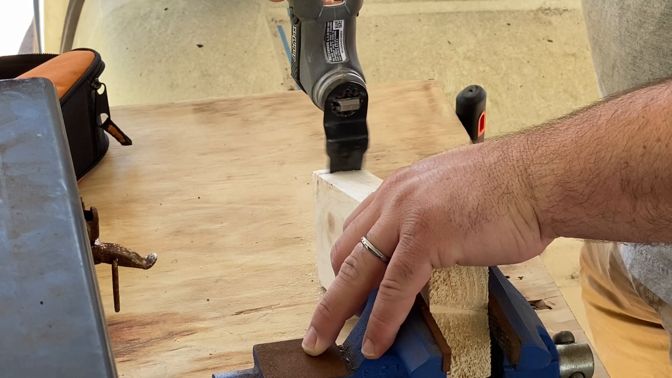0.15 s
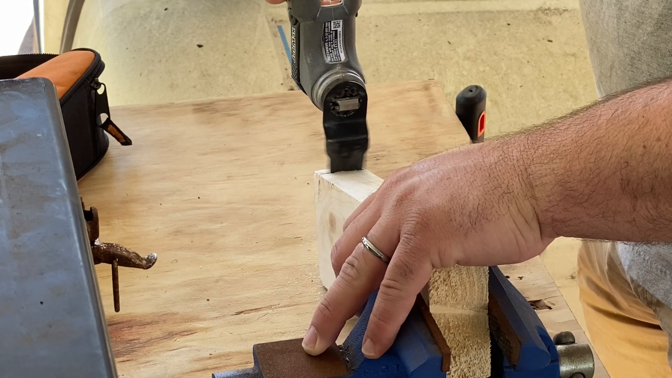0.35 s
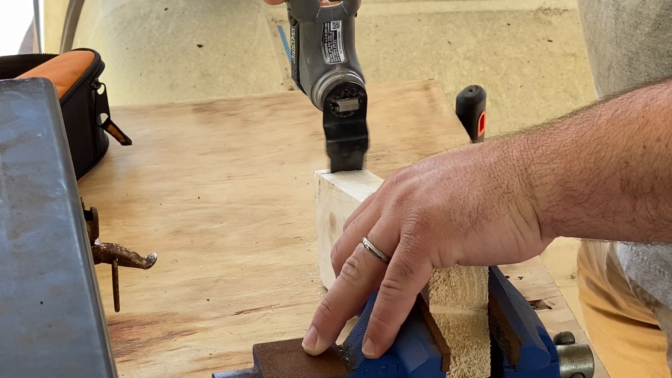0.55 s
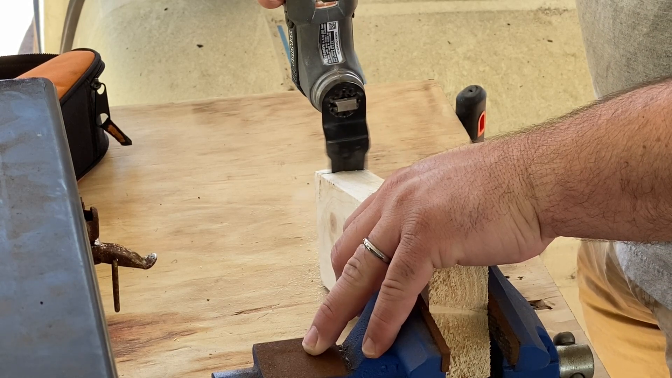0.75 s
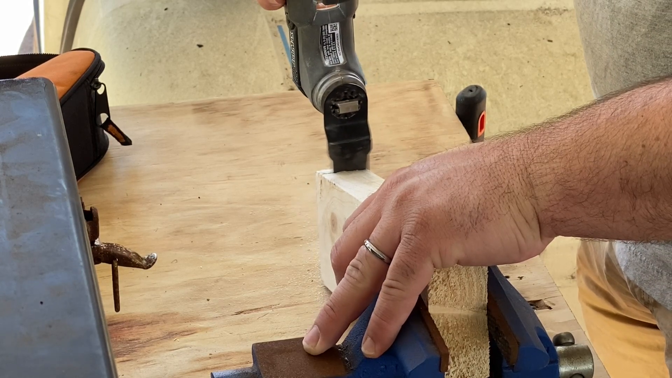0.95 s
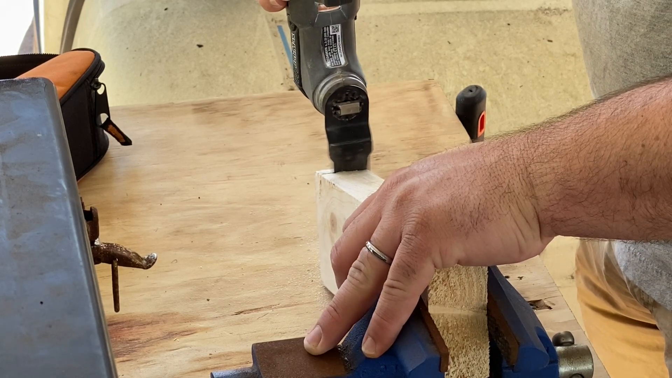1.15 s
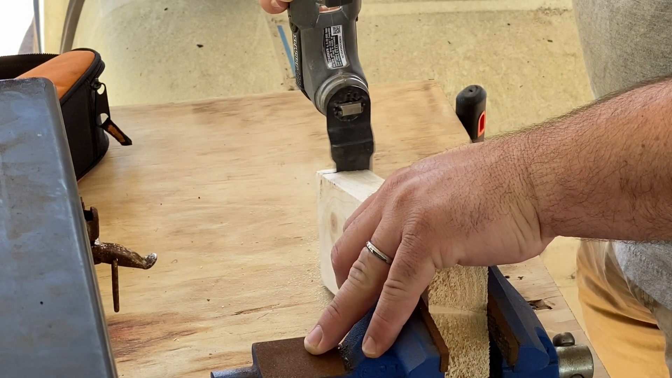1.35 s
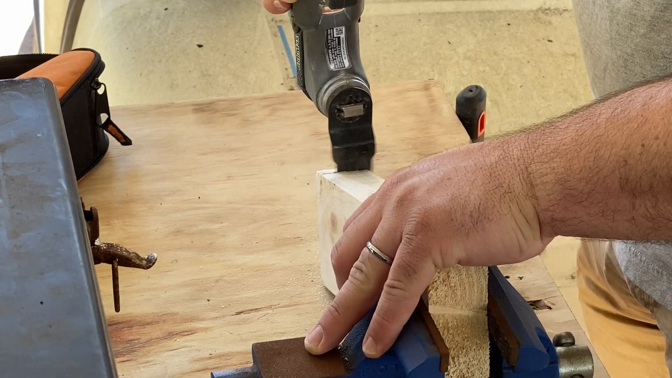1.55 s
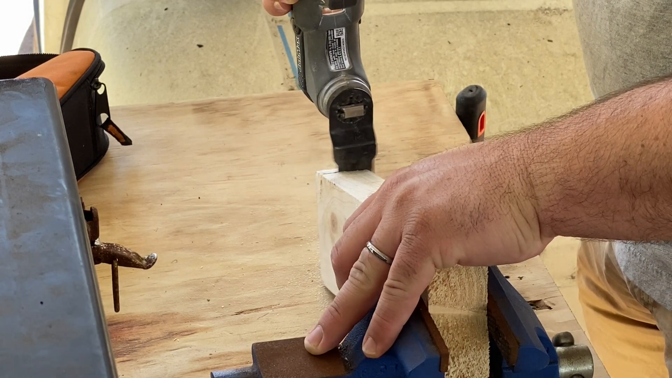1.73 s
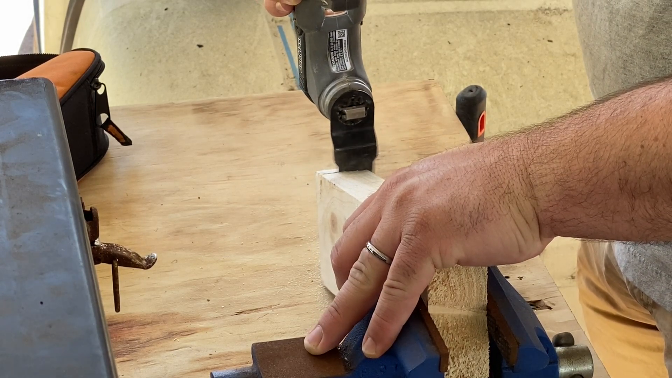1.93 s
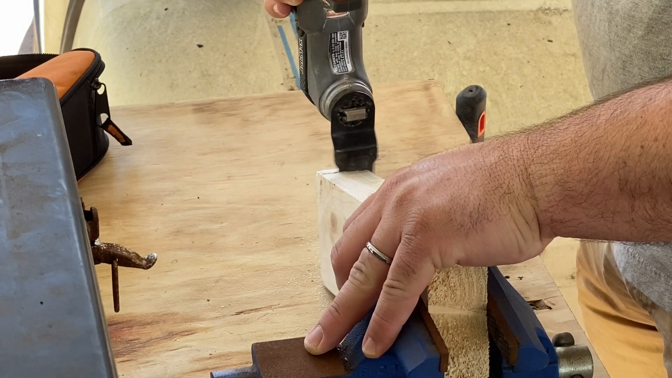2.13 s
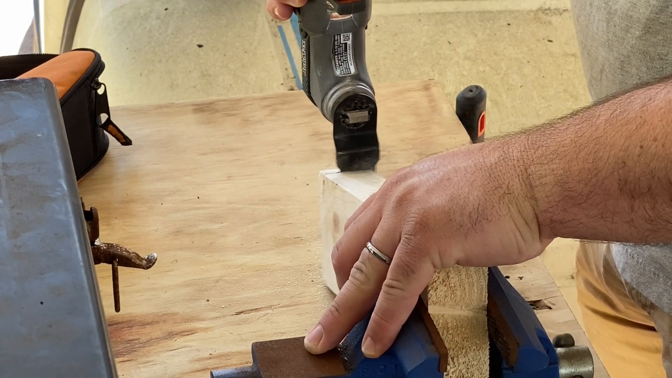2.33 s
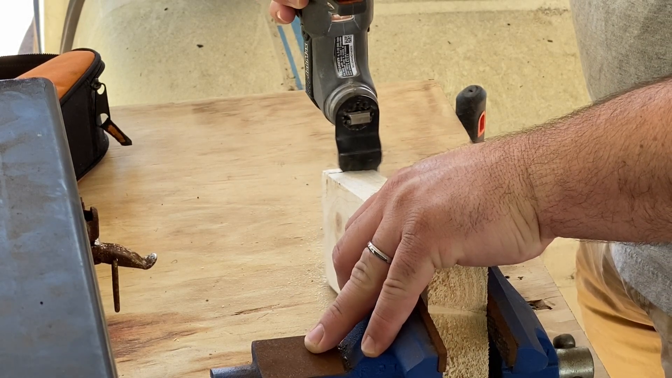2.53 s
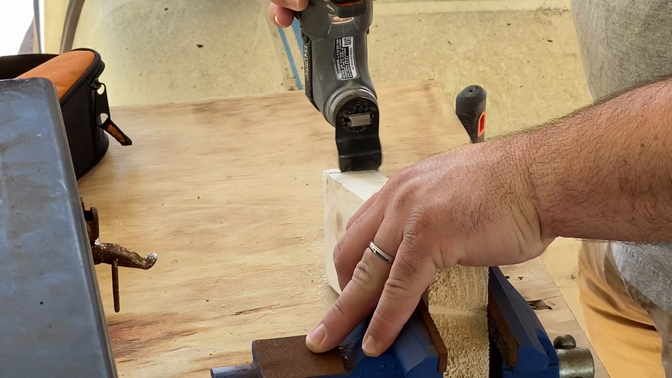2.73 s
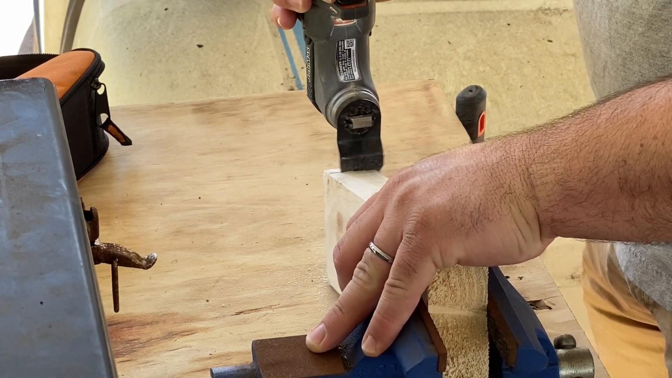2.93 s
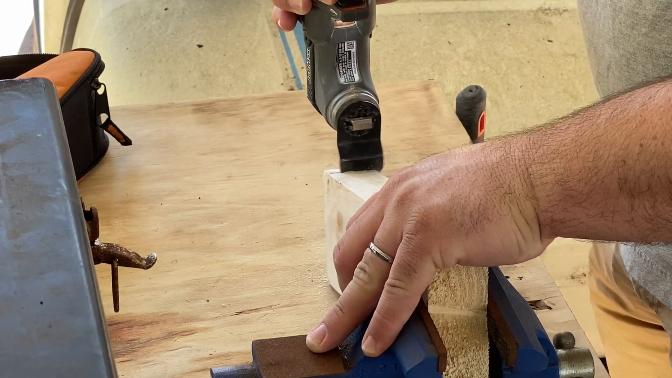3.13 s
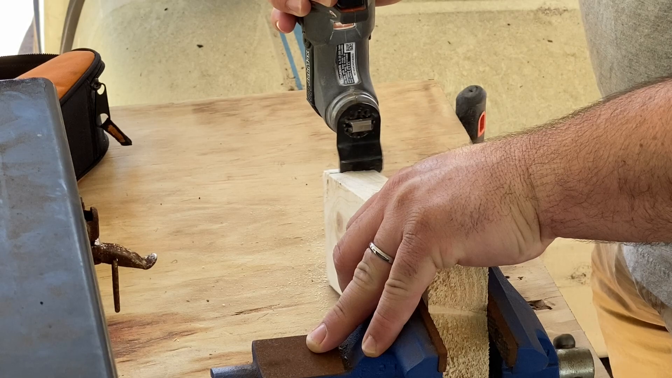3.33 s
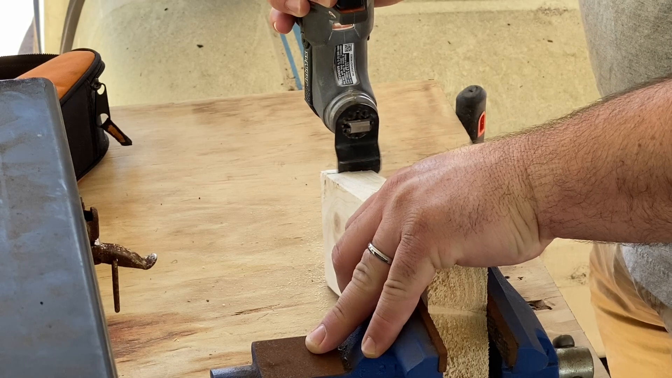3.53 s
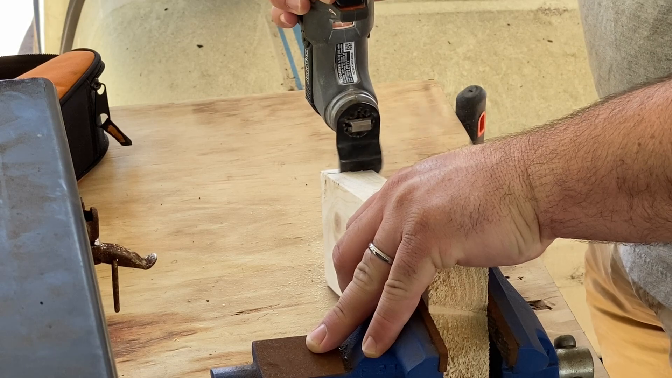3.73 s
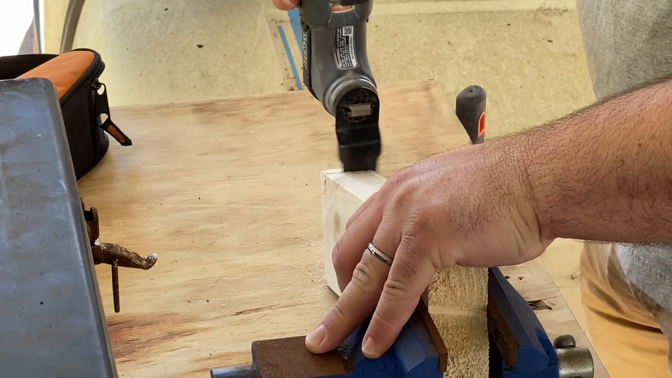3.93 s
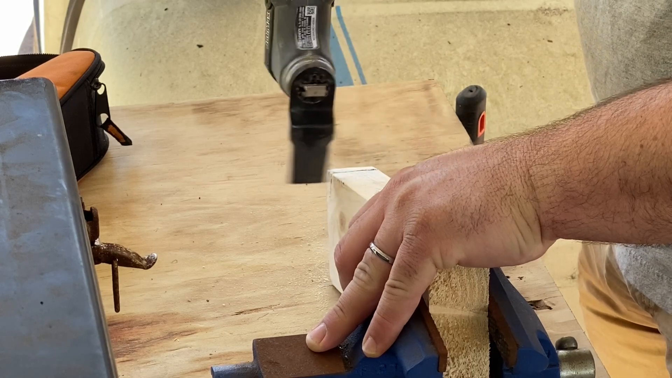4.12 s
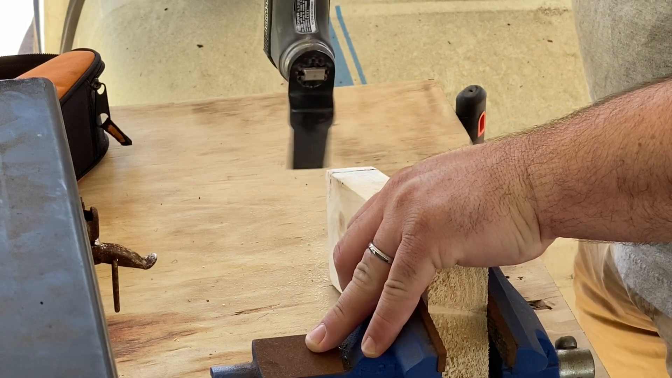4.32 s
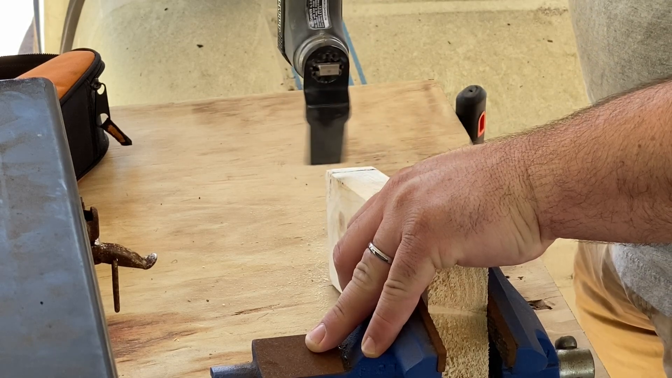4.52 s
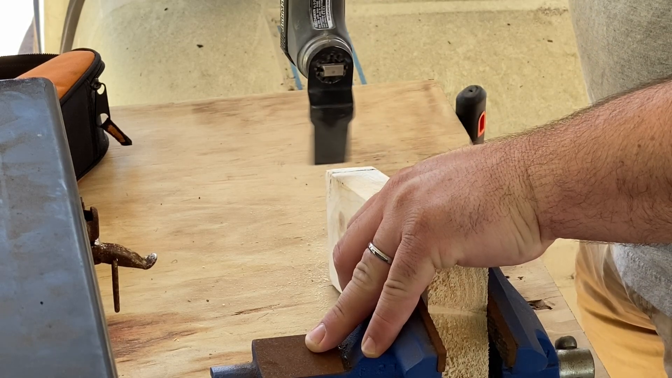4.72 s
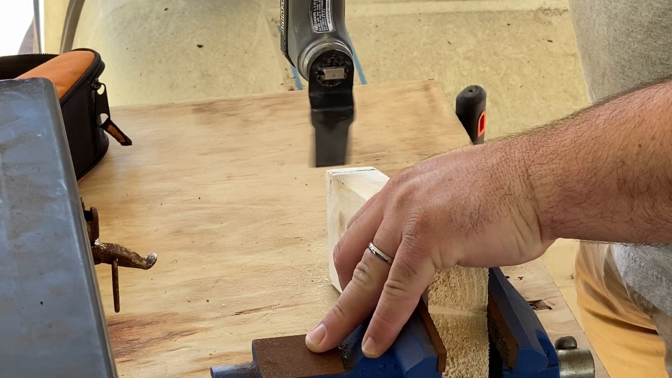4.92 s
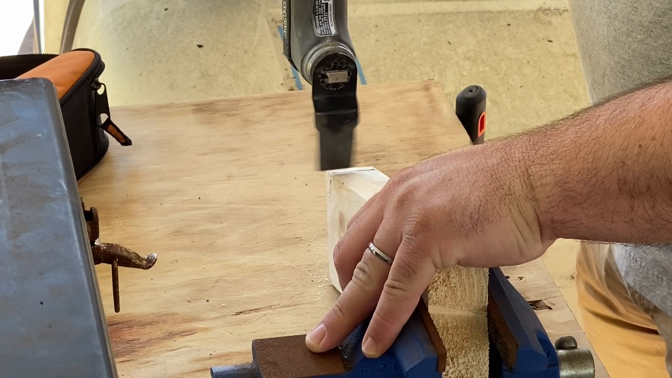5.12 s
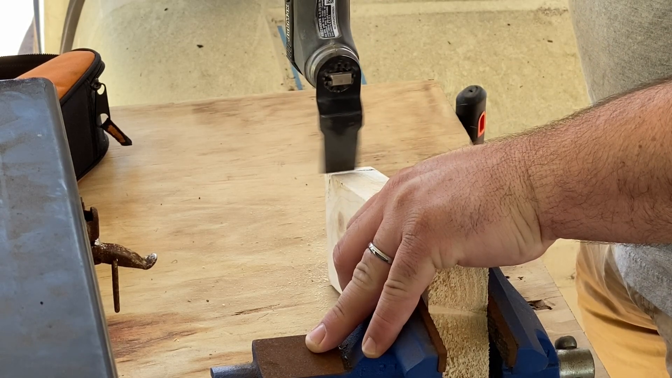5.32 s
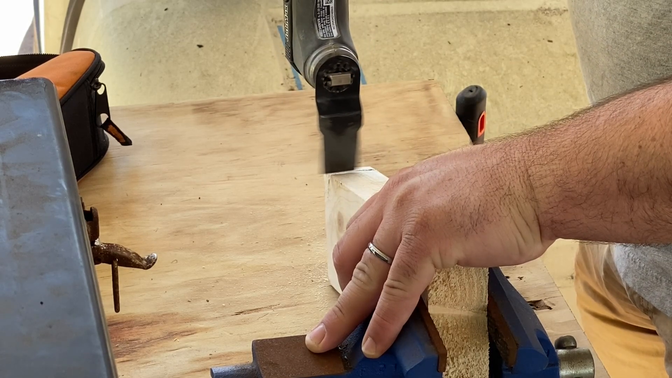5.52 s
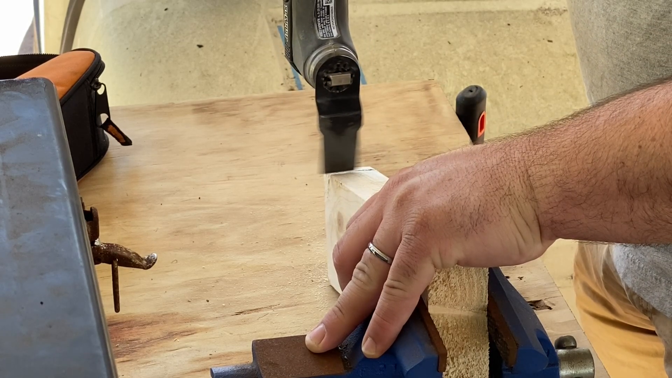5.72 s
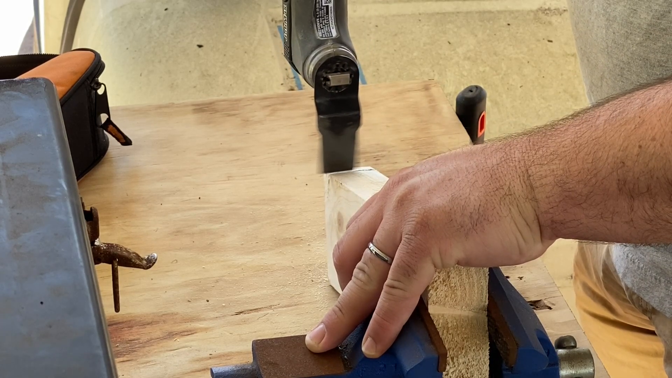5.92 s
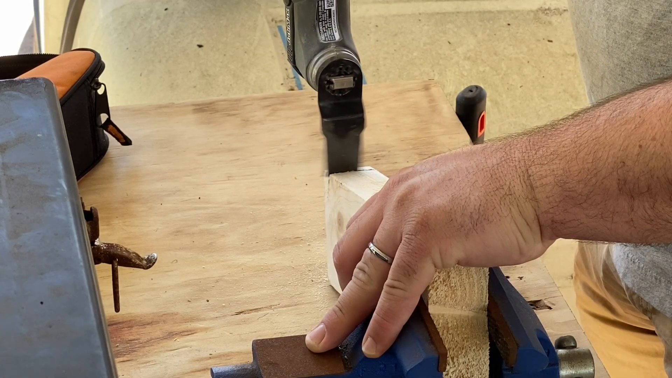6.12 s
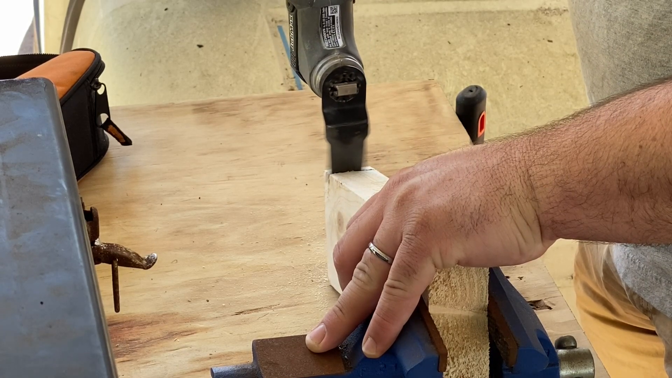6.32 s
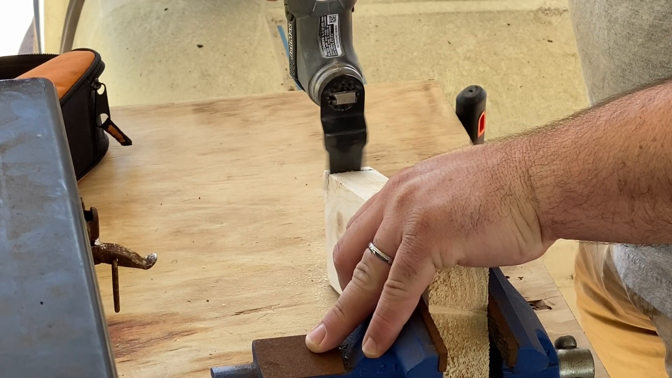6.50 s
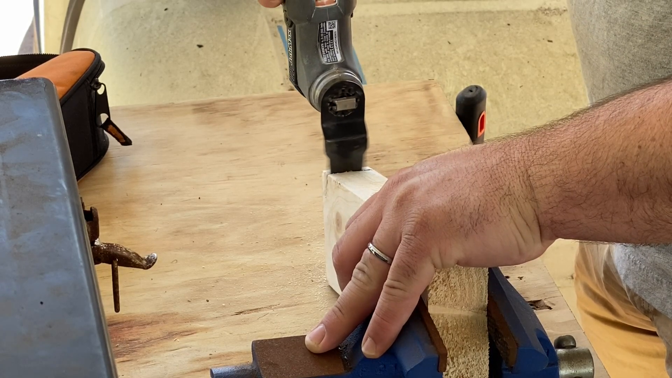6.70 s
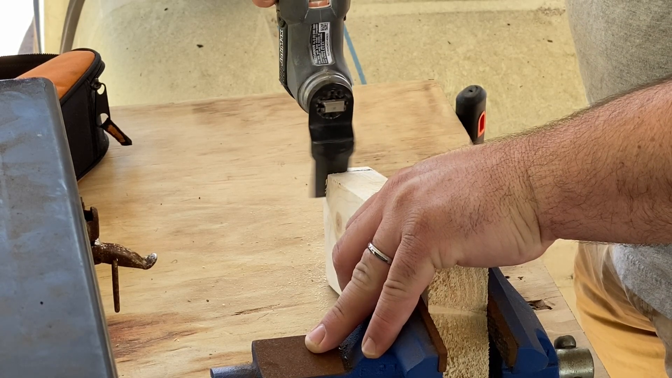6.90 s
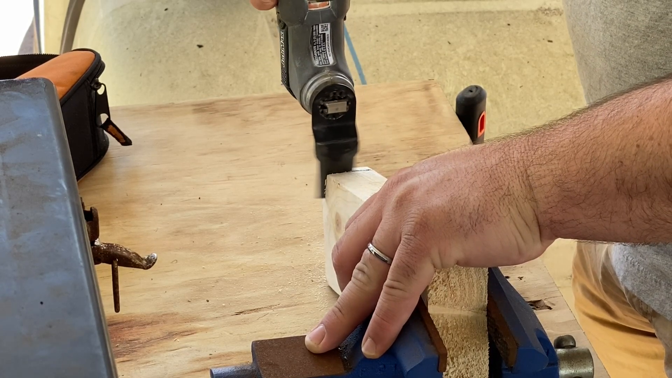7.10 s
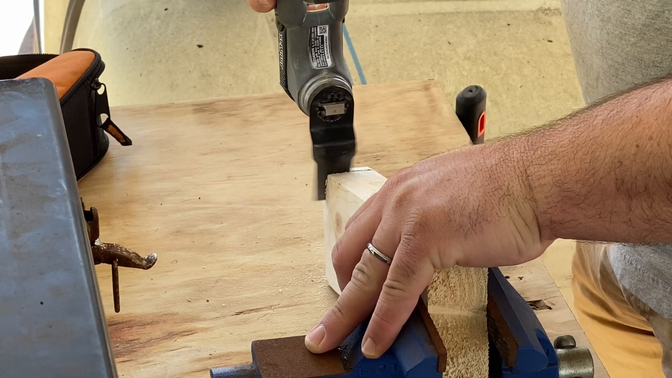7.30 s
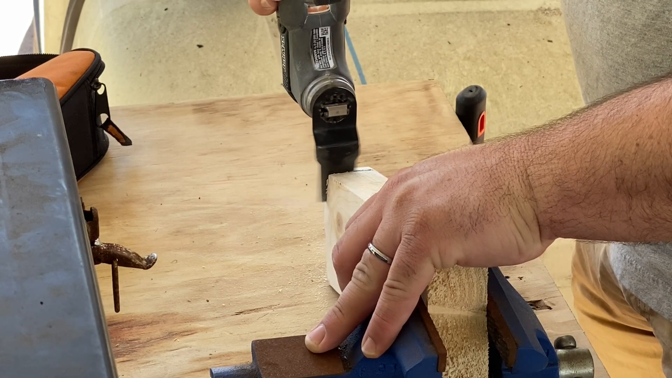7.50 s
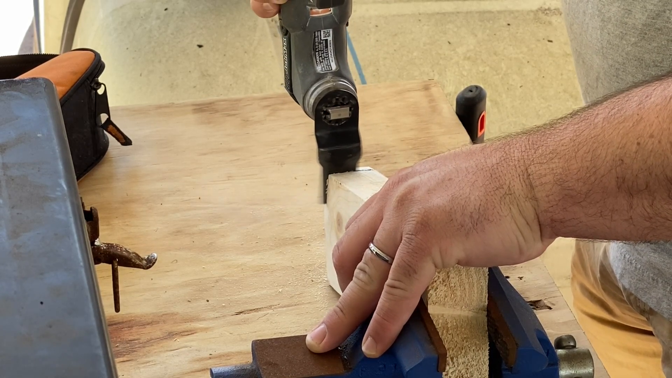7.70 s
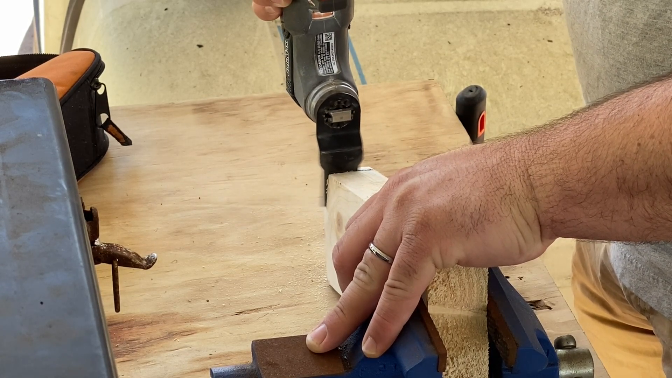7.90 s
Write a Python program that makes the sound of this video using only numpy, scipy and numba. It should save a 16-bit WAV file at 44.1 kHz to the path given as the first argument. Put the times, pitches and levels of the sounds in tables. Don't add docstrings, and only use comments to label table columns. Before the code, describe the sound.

Close stereo pickup in a small workshop with a faint low rumble and very short reflections. At 0 s an oscillating saw whines rapidly upward, reaching a steady buzz around 310 Hz by 0.3 s, with raspy teeth and metallic ringing. From about 0.7 s the clamped wood block shakes strongly, adding a heavy hum as the pitch sags. At 2.2 s the blade goes deep: a labouring drone near 275 Hz, dense rasp and ringing kerf. From 3 s it backs out, pitch rising and weight falling away. Around 3.9-4.2 s come a ringing jolt, short bright scrapes and a dull thud. Then a quieter, thinner buzz near 315 Hz with fork rattle, fan hiss and high airy sizzle; light grazes at 5.3-5.7 s, firmer taps at 6.7-7 s. From 7.35 s it bites again, growing louder and lower until the cut-off at 8 s.

```python
import sys
import numpy as np
from scipy import signal
from scipy.fft import rfft, irfft, next_fast_len
from scipy.io import wavfile
from scipy.ndimage import uniform_filter1d
from numba import njit

SR = 44100
rng = np.random.default_rng(int(sys.argv[2]) if len(sys.argv) > 2 else 0)


def inscribe(sig):
    pcm = np.round(np.clip(np.atleast_2d(sig).T, -1, 1) * 32767)
    wavfile.write(sys.argv[1], SR, pcm.astype(np.int16))


def ratio_of_db(decibels):
    return 10 ** (np.asarray(decibels, float) / 20)


N = 355049
T = np.arange(N) / SR

# [t/s, buzz level/dB, ring level/dB]
TOOL_LEVELS = [(0, -24, -11), (.12, -20, -3.5), (.3, -20.5, -24), (.6, -21.5, -7), (1.0, -22, -16),
               (1.75, -26, -18), (2.17, -26, -8), (2.24, -22, -15), (2.65, -21.5, -12.5), (3.1, -26, -13),
               (3.69, -26.5, -15), (3.74, -33.5, -8), (3.88, -35.5, -2), (3.93, -33.5, 6.5),
               (4.2, -35.5, -23), (4.4, -31, -6), (7.3, -29.5, -13), (8.05, -25.5, -30)]
# [t/s, bite 0-1]
BITE = [(0, 0.95), (.1, 0.48), (.5, 0.23), (.85, 0.37), (1.25, 0.5), (1.6, 0.77), (2.15, 0.88), (3.65, .85),
        (3.88, 0.44), (3.93, 0.3), (4.12, 0.24), (4.28, .02), (5.0, 0.02), (5.45, 0.25), (6.35, .01),
        (6.65, 0.29), (7.35, 0.26), (8.05, 0.27)]
DEEP_S = [2.17, 2.24, 3.68, 3.75]
OUT_S = [2.9, 3.3, 3.8, 4.3]
TORQUE_HZ = 120.15
AIR_DB, AIR_BITE_DB = 3.5, -3.5


def saw():
    buzz_db, ring_db = curves(TOOL_LEVELS)
    bite = np.clip(curves(BITE)[0], 0, 1)
    deep = np.interp(T, DEEP_S, [0, 1, 1, 0])
    out = np.interp(T, OUT_S, [0, 1, 1, 0])
    turns = swing()
    mains = np.sin(2 * np.pi * TORQUE_HZ * T)
    stroke = 1 + 0.2 * np.sin(2 * np.pi * turns) + 0.081 * (1 - bite) * np.sin(np.pi * turns)
    gate = (1 + 0.013 * mains) * stroke
    settled = np.clip(T / 0.3, 0, 1) ** 2

    cut = ratio_of_db(-2.5 - 0.5 * deep) * settled * cutting_whine(turns)
    cut = cut + ratio_of_db(-2.5 - 0.38 * deep - 1.8 * out * deep) * teeth(gate)
    cut = cut + struck_blade(turns, mains, ring_db, deep, out)
    free = running_free(turns, gate, settled)
    body = np.sqrt(1 - bite) * free + np.sqrt(bite) * cut
    buzz = ratio_of_db(buzz_db) * (body + ratio_of_db(AIR_DB + AIR_BITE_DB * bite) * air(gate))
    buzz = buzz + shake_overtones(turns, bite) + catches()
    buzz = buzz + bench(buzz_db, bite, out) + room_rumble(buzz_db)
    return np.sqrt(2) * block_shake(turns), buzz


# [t/s, f/Hz]
SWING_RATE = [(0, 312.3), (.56, 311.8), (.74, 303.8), (.96, 293.1), (1.21, 290.3), (2.17, 285.6),
              (2.33, 277.7), (2.5, 274.6), (3.0, 273.4), (3.36, 278.5), (3.62, 287), (3.77, 303.5),
              (3.94, 310), (4.4, 315.5), (6.2, 319), (6.61, 315.3), (7.3, 315.3), (8.05, 298.3)]
SPIN_UP_HZ, SPIN_UP_S, LOCK_S = 101, .1, .3


def swing():
    missing = SPIN_UP_HZ * np.exp(-T / SPIN_UP_S - (T / LOCK_S) ** 4)
    hz = uniform_filter1d(curves(SWING_RATE)[0], size=4000) - missing
    return np.cumsum(hz * (1 + .0005 * fine(walk(30)))) / SR


# [t/s, level/dB]
SHAKE = [(0, -30.5), (.22, -30.5), (.52, -34), (.76, -21.5), (1.1, -14), (2.13, -17.5), (3.0, -22.5),
         (3.6, -27), (3.7, -29), (3.83, -53), (4.33, -61), (6.17, -59.5), (6.61, -40), (6.84, -52),
         (7.26, -46), (7.36, -33.5), (7.69, -28.5), (8.05, -22.5)]
# [t/s, level/dB, length/s]
GRAZE = [
    (3.943, -43, 0.016),
    (4.045, -44.5, 0.079),
    (5.255, -44, 0.013),
    (5.372, -46, 0.018),
    (5.61, -48, 0.011),
    (5.72, -57, 0.13),
    (6.662, -42, 0.0074),
    (6.914, -33, 0.013),
    (6.96, -38, 0.0068),
]


def block_shake(turns):
    rock = np.sin(2 * np.pi * turns + 1)
    steady = ratio_of_db(curves(SHAKE)[0] + 0.65 * fine(walk(12))) * rock
    graze = sum(ratio_of_db(db) * np.exp(-.5 * ((T - s) / w) ** 2) for s, db, w in GRAZE)
    return steady + graze * (rock + 0.35 * np.sin(8 * np.pi * turns))


# [t/s, 2nd partial level/dB, 3rd partial level/dB, 5th partial level/dB]
OVERTONES = [(0, -33, -31, -47), (.1, -37.5, -28.5, -35), (.38, -36, -32, -44), (.55, -52, -49, -46),
             (.76, -40, -32, -36), (1.1, -43, -42, -37.5), (1.3, -35.5, -42, -35), (2.15, -30.5, -54, -38),
             (2.28, -36.5, -32, -39), (3.2, -39.5, -42.5, -40), (3.45, -36.5, -36, -44),
             (3.7, -39, -32.5, -45), (3.8, -52, -46.5, -60), (4.4, -61, -43, -48), (6.3, -57, -44.5, -55),
             (7.2, -47.5, -44.5, -51), (7.5, -38.5, -43, -52), (8.05, -41, -41, -39)]


def shake_overtones(turns, bite):
    edge = 0
    for k, db in zip((2, 3, 5), curves(OVERTONES)):
        level = np.sqrt(2) * ratio_of_db(db + 3 * bite * fine(walk(9)))
        edge = edge + level * np.sin(2 * np.pi * k * turns + k)
    return edge


# [multiple of swing rate, level/dB]
START = [(4, -21), (6, -9), (7, -5), (8, 4.5), (9, -3), (10, -4.5), (11, -5), (12, 1.5), (13, -10),
         (14, -0.5), (15, -2.5), (16, 1.5), (17, -3), (18, -6), (19, -12), (20, 1.5), (22, 2), (23, -17),
         (24, 3), (25, -1), (26, -1)]
CUT = [(4, 2.5), (6, -1.5), (7, -38), (8, 7), (8.5, 3), (9, -7), (10, 0.5), (11, 0.5), (12, -3.5), (13, -4),
       (14, 2), (15, 1.5), (16, 1.5), (17, -13), (18, 5.5), (19, -22), (20, -21), (21, -21), (22, 5),
       (23, -33), (24, -12), (25, -14), (28, 1), (30, 6)]
DEEP = [(4, -11), (6, -18), (7, 0.5), (8, 0), (9, 2), (10, -5.5), (11, -16), (12, -10), (13, -4), (14, -17),
        (14.5, -4.5), (15, -14), (17, 0), (18, -8), (19, -4), (20, -18), (21, -4)]
BACK = [(4, -5.5), (6, -10), (7, -2.5), (8, -8), (9, 6.5), (10, -14), (11, -16), (12, -8.5), (13, -9.5),
        (14, -8), (16, -0.5), (17, -2), (18, -3), (25, -12), (26, -15)]
AGAIN = [(1.5, -12), (4, -4), (6, 0), (7, -8), (8, -2), (9, -10), (10, -8), (11, 2), (12, -5), (13, -6),
         (14, -9), (15, -5), (16, -9), (17, -6), (18, -4), (19, 0), (20, -1), (21, -4), (22, -10)]
# [start t/s, end t/s, level/dB]
STAGES = [
    (0, .77, 4),
    (.77, 2.2, 0),
    (2.2, 3.15, 0),
    (3.15, 3.74, 4),
    (3.74, 7.42, -6),
    (7.42, 9, 4),
]


def cutting_whine(turns):
    lines = 0
    for (start, end, db), table in zip(STAGES, (START, CUT, DEEP, BACK, AGAIN, AGAIN)):
        share = uniform_filter1d(ratio_of_db(db) * (T >= start) * (T < end), size=4000)
        lines = lines + share * whine(turns, table, wander_db=1.4, drift=.05)
    return patchy(lines, spread_db=2.5, rate=5, width_hz=300)


# [f/Hz, level/dB per Hz]
TEETH = [(230, -15), (330, -5.5), (550, -2), (680, -7), (900, -4), (1500, -3), (2400, -3), (3300, -2.5),
         (4200, -3), (5500, 0.5), (8300, -1), (9000, -37)]


def teeth(gate):
    return hiss(TEETH, gate, flicker_db=2.0)


# [f/Hz, width/Hz, level/dB]
BLADE_IN = [(1100, 200, -7), (1950, 150, -3), (2400, 350, -1), (4680, 340, 1), (5300, 250, -6),
            (5800, 380, 1)]
# [f/Hz, width/Hz, level/dB]
BLADE_OUT = [(1100, 200, -12), (1970, 150, -8), (2450, 220, -2), (4620, 300, 0), (7200, 400, 0)]
DEEP_RING_DB = 10.5


def struck_blade(turns, mains, ring_db, deep, out):
    blows = knocks(turns, weak=.9, scatter_db=1.5) * (.4 + 1.1 * mains)
    blows = blows + .045 * rng.standard_normal(N)
    modes = (1 - out) * ring(blows, BLADE_IN) + out * ring(blows, BLADE_OUT)
    return ratio_of_db(ring_db + DEEP_RING_DB * deep) * modes


# [t/s, scrape level/dB, thud level/dB, length/s]
CATCH = [
    (4.092, -26.5, -52, 0.0036),
    (4.105, -45, -33, 0.0093),
    (4.173, -24.5, -53, 0.0057),
    (4.193, -33, -47, 0.013),
]


def catches():
    scrape = colour(rng.standard_normal(N), TEETH)
    thud = colour(rng.standard_normal(N), [(120, -11), (200, 2), (400, -27), (800, -8)])
    out = 0
    for s, scrape_db, thud_db, length in CATCH:
        swell = np.exp(-.5 * ((T - s) / length) ** 2)
        out = out + swell * (ratio_of_db(scrape_db) * scrape + ratio_of_db(thud_db) * thud)
    return out


# [multiple of swing rate, level/dB]
FREE = [(3.5, -11), (4, -11), (4.5, -11), (2.5, -13), (6, -3), (7, -4), (7.5, -13), (8, -11), (9, 1.5),
        (9.5, -10), (10, -9), (13, -12), (13.5, -10), (14, -8), (15, -9), (16.5, -6), (17, -7), (17.5, -10),
        (18.5, -1), (19, -5), (19.5, 1), (20, 0), (20.5, -4), (21, -5), (22, -5), (23, -8), (23.5, -2),
        (24.5, -3), (33, -1), (36, -3)]
# [f/Hz, level/dB per Hz]
FAN = [(250, -13), (450, -51.5), (700, -16), (900, -5.5), (1200, -19), (1800, -5.5), (2900, -5.5),
       (4100, -10), (5300, -4), (6200, -0.5), (6900, -1.5), (7600, 2), (8200, 3.5), (8600, -12)]


def running_free(turns, gate, settled):
    fork = whine(turns, FREE, wander_db=1.8, drift=0.12)
    return ratio_of_db(-4.5) * settled * fork + ratio_of_db(-2.5) * hiss(FAN, gate, flicker_db=2.05)


# [f/Hz, level/dB per Hz]
AIR = [(7800, -15), (8400, 8), (10000, -2.5), (12500, -4), (14000, 1), (15700, -7.5), (16200, -59)]
# [f/Hz, width/Hz, level/dB]
TIP = [(10370, 90, 0)]
# [t/s, level/dB]
SING = [(.8, -35), (1.2, -12.5), (2.9, -12.5), (3.3, -55), (4.2, -8), (4.5, -13), (6, -58), (6.6, -52)]


def air(gate):
    tip = ratio_of_db(curves(SING)[0] + 1.9 * fine(walk(5.7)))
    return hiss(AIR, gate, flicker_db=1.0) + tip * ring(rng.standard_normal(N), TIP)


# [f/Hz, level/dB per Hz]
BENCH = [(80, -78), (120, -11.5), (165, -6.5), (200, 3), (235, -11), (330, -9)]
BENCH_DB, BENCH_POWER, BENCH_OUT_DB = -15, 0.77, -5


def bench(buzz_db, bite, out):
    level_db = buzz_db + BENCH_DB + BENCH_OUT_DB * out + 1.6 * fine(walk(7.4))
    return ratio_of_db(level_db) * (bite + 0.012) ** BENCH_POWER * colour(rng.standard_normal(N), BENCH)


# [f/Hz, level/dB per Hz]
SHOP = [(20, -34), (45, -20), (70, -14.5), (120, -4), (200, -29), (400, -28)]
SHOP_DB = -61


def room_rumble(buzz_db):
    return ratio_of_db(SHOP_DB + 0.83 * (buzz_db + 28)) * colour(rng.standard_normal(N), SHOP)


def shop(x, t60_s):
    lag = np.arange(int(.3 * SR)) / SR
    decay = np.exp(-np.log(1000) * lag / t60_s) * (lag > .004)
    tail = rng.standard_normal((2, len(lag))) * decay
    return signal.fftconvolve(x[None], tail / np.sqrt(np.sum(tail[0] ** 2)), axes=1)[:, :N]


def whine(turns, table, wander_db, drift):
    kept = [(round(2 * k) / 2, db) for k, db in table if round(2 * k) not in (2, 4, 6, 10)]
    orders, db = np.transpose(kept)
    count = len(orders)
    gain = ratio_of_db(db[:, None] + wander_db * walk(3.817, count))
    shift = rng.uniform(0, 2 * np.pi, (count, 1)) + drift * np.sqrt(orders[:, None]) * walk(15.0, count)
    return unit(stack(turns, orders, gain, shift))


@njit
def stack(turns, orders, gain, shift):
    y = np.zeros(len(turns))
    for i in range(len(turns)):
        j, u = i // 64, (i % 64) / 64
        for k in range(len(orders)):
            g = gain[k, j] + u * (gain[k, j + 1] - gain[k, j])
            p = shift[k, j] + u * (shift[k, j + 1] - shift[k, j])
            y[i] += g * np.sin(2 * np.pi * orders[k] * turns[i] + p)
    return y


def knocks(turns, weak, scatter_db):
    at = np.interp(np.arange(1, int(turns[-1])), turns, np.arange(N))
    size = np.where(np.arange(len(at)) % 2, weak, 1) * ratio_of_db(scatter_db * rng.standard_normal(len(at)))
    out, i = np.zeros(N + 8), at.astype(int)
    for k in range(-3, 5):
        gap = i + k - at
        out[i + k] += size * np.sinc(gap) * np.cos(np.pi * gap / 8) ** 2
    return out[:N]


def hiss(table, gate, flicker_db):
    return patchy(colour(rng.standard_normal(N) * gate, table), flicker_db, rate=11.0, width_hz=1200)


def patchy(x, spread_db, rate, width_hz):
    _, _, z = signal.stft(x, nperseg=512)
    along, across = int(SR / 256 / rate) + 1, int(width_hz * 512 / SR) + 1
    field = uniform_filter1d(rng.standard_normal(z.shape), along, axis=1)
    field = uniform_filter1d(field, across, axis=0)
    return unit(signal.istft(z * ratio_of_db(spread_db * unit(field)))[1][:N])


def ring(x, modes):
    out = 0
    for k, (hz, width, db) in enumerate(modes):
        b, a = signal.iirpeak(hz, hz / width, SR)
        mode = signal.lfilter(b, a, signal.lfilter(b, a, x))
        out = out + (-1) ** k * ratio_of_db(db) * unit(mode)
    return unit(out)


def colour(x, table):
    hz, db = np.transpose(table)
    size = next_fast_len(N)
    f = np.arange(size // 2 + 1) * SR / size + 1
    gain = ratio_of_db(np.interp(np.log(f), np.log(hz), db, left=-90, right=-90))
    return unit(irfft(rfft(x, size) * gain, size)[:N])


def walk(rate, count=1):
    k = max(int(SR / 64 / rate), 1)
    steps = np.repeat(rng.standard_normal((count, 400)), k, axis=1)[:, :N // 64 + 2]
    return 1.54 * uniform_filter1d(uniform_filter1d(steps, k), k)


def fine(w):
    return np.interp(np.arange(N) / 64, np.arange(w.shape[-1]), w.ravel())


def curves(table):
    s, *columns = np.transpose(table)
    return [np.interp(T, s, c) for c in columns]


def unit(x):
    return x / np.sqrt(np.mean(x ** 2))


def scene():
    shake, buzz = saw()
    near = shake * ratio_of_db(np.array([[1.1], [-1.1]])) + buzz
    band = signal.butter(4, [70, 2100], "bandpass", fs=SR, output="sos")
    return near + ratio_of_db(-10) * signal.sosfilt(band, shop(buzz, t60_s=.25))


def top_cut(x):
    return signal.sosfilt(signal.butter(12, 16010, fs=SR, output="sos"), x)


# [f/Hz, phase/radians]
PORTS = [(60, 0), (340, -.1), (600, -.8), (950, 0), (1290, .6), (1800, 0)]
# [f/Hz, phase/turns]
TREBLE_TURNS = [(8230, 0), (8270, .49), (8900, .51), (10500, .99), (11950, 1.01), (12900, 1.49),
                (14000, 1.51), (15100, 2)]
SPLIT_HZ = 8190


def record(dry):
    size = next_fast_len(N)
    f = np.arange(size // 2 + 1) * SR / size
    lead = np.interp(f, *np.transpose(PORTS)) + 2 * np.pi * np.interp(f, *np.transpose(TREBLE_TURNS))
    dip = 1 - .93 * np.exp(-.5 * ((f - SPLIT_HZ) / 60) ** 2)
    scatter = unit(uniform_filter1d(rng.standard_normal(len(f)), size=120)) * (f > SPLIT_HZ)
    left, right = rfft(dry, size) * dip
    mid = (left + right) / 2
    side = (left - right) / 2 + .8j * np.sin(lead / 2) * mid * np.exp(1.3j * scatter)
    mid = mid * np.cos(lead / 2)
    mix = irfft(np.array([mid + side, mid - side]), size)[:, :N]
    return top_cut(mix)


dry = scene()
out = record(dry)
inscribe(out)
```